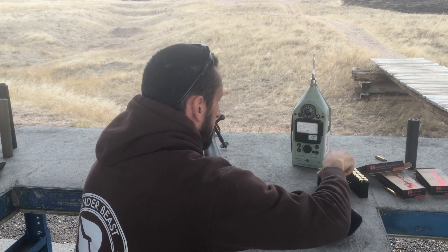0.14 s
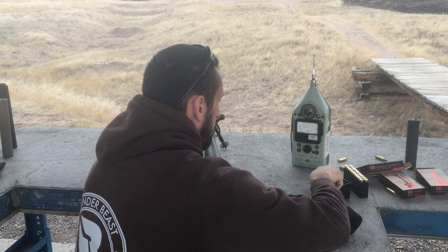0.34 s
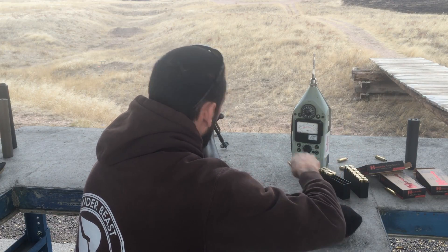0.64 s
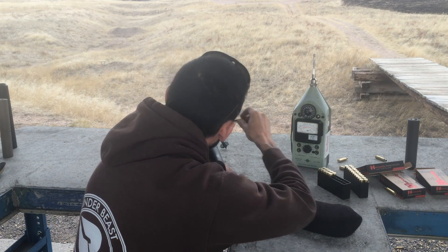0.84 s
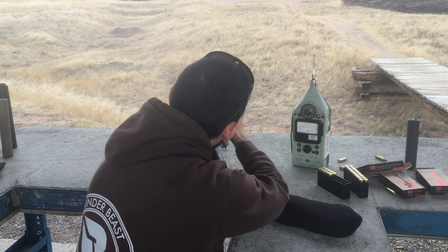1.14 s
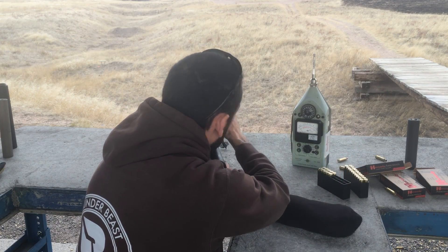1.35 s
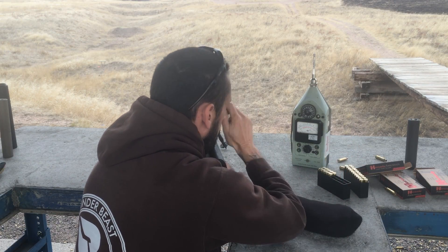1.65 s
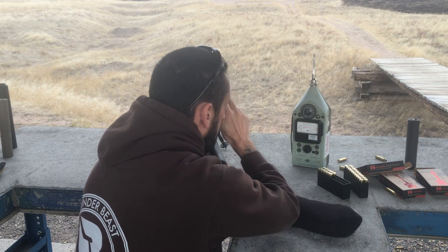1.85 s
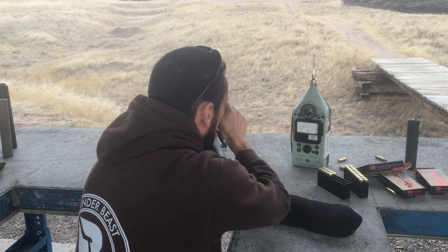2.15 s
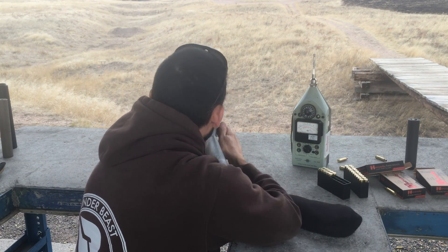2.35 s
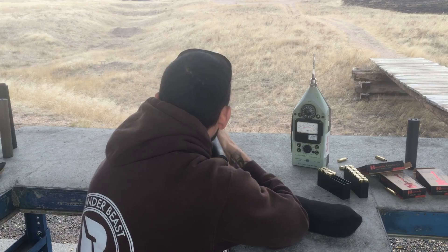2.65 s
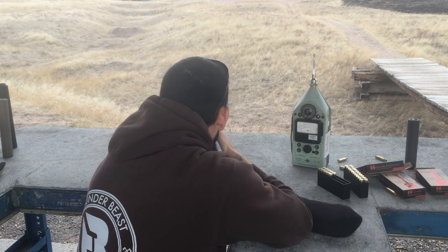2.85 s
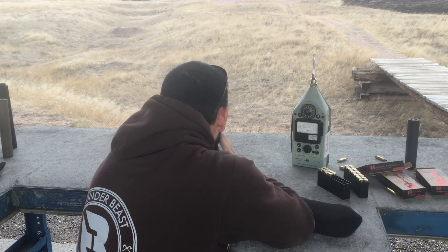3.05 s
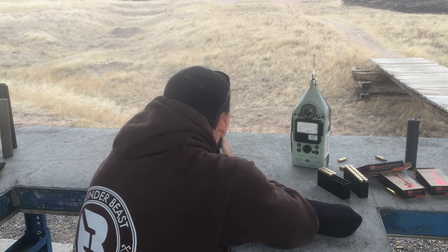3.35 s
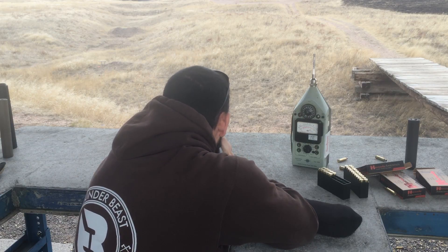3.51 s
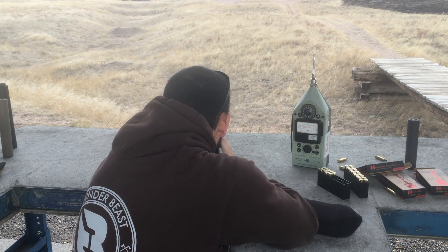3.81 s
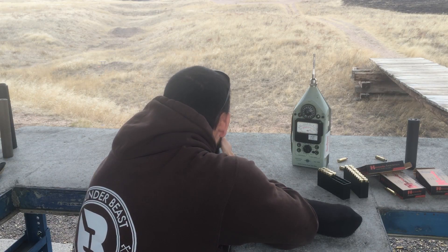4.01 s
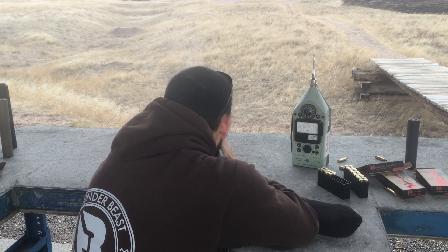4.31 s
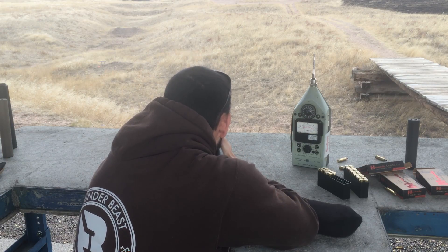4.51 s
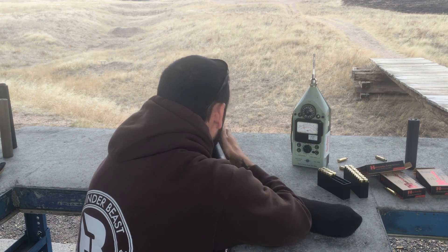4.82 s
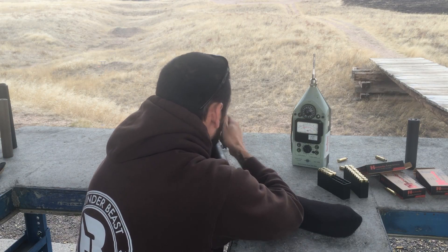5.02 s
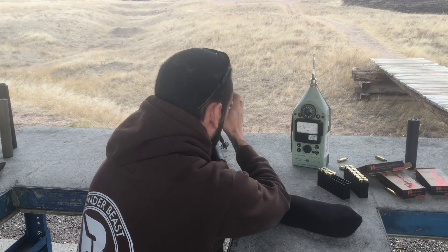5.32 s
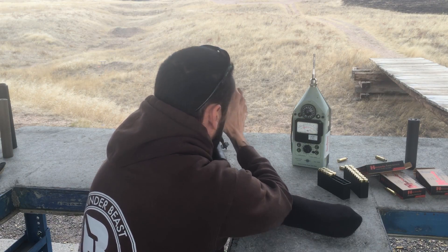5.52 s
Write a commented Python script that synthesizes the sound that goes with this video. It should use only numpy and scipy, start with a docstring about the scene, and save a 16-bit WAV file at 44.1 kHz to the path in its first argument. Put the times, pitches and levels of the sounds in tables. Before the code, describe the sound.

A single microphone near a rifle under a shelter roof hears small knocks and brass chinks, then a busy run of steel clatter ending in a firm bolt clack. After a quiet, windy wait with tiny regular ticks, a suppressed shot bursts as crack, gritty gas and low thump, scatters briefly off the slope, and the bolt is worked again.

```python
"""A suppressed rifle on a concrete bench under a shelter roof, heard by one microphone just behind it.
All through, wind buffets the microphone over a low background and a far motor drones: shaped noise.
First a cartridge is picked up and loaded and the steel bolt closed: bursts of contacts ringing resonances.
From 0.7 s a small mechanism ticks about once a second: paired sines with a noisy snap. At 4.3 s comes one
shot: soft noise, a tone, crack, venting gas and boom; noise and slaps off the hillside; the bolt opens."""
import sys
import numpy as np
from scipy import signal
from scipy.fft import rfft, irfft
from scipy.io import wavfile
from scipy.ndimage import uniform_filter1d

SR = 44100
rng = np.random.default_rng(int(sys.argv[2]) if len(sys.argv) > 2 else 0)


def transcribe(signal):
    """Save signal, clipped to [-1, 1], as a 16-bit WAV file at the path in sys.argv[1]."""
    frames = np.atleast_2d(signal).T
    limited = np.clip(frames, -1, 1)
    pcm = np.round(limited * 32767).astype(np.int16)
    wavfile.write(sys.argv[1], SR, pcm)


def ratio(d):
    """dB to gain"""
    e = np.asarray(d, float) / 20
    return 10 ** e


N = 249914

# Soft broad noise rising just before the blast, then a 2.65 kHz tone: [t/s, level/dB, share of tone 0-1]
LEAD_IN = [(4.2865, -38, 0), (4.296, -28, .7), (4.3025, -15, 1)]
LEAD_IN_HZ, LEAD_IN_T60_S = 2650, 0.05
BLAST_S = 4.307
# Spectrum of the vented gas: [f/Hz, relative density/dB]
GAS = [(88, -19), (150, -1.5), (328, -14.5), (523, -21.5), (636, -17.5), (1310, -10.5), (1500, -16),
       (2220, -13), (3480, -21.5), (4060, -20), (4840, -20), (5780, -21), (9050, -25.5), (15900, -32.5)]
# Decay of the gas by band: [f/Hz, T60/s, venting/s]
GAS_DECAY = [(150, 0.36, 0.025), (350, 0.28, 0.022), (700, 0.21, 0.026), (1500, 0.19, 0.028),
             (3050, 0.2, 0.028), (6000, 0.17, 0.032), (11800, 0.11, 0.039)]
GAS_DB = -11.5  # rms while venting, before the grit
# Boom of bench and roof: [f/Hz, level/dB, T60/s, onset after the blast/s]
BOOM = [(60.6, -16.5, .3, .01), (126.6, -10, 0.28, .0142), (187, -19.5, 0.17, 0.023),
        (228, -14, 0.12, 0.0057), (296.4, -14.5, 0.24, 0.0089), (406.8, -21.5, 0.18, 0.023),
        (653, -10.5, 0.024, 0.011)]

# Return from the hillside, middle band: [t/s, level/dB]
HILL = [(4.42, -41.5), (4.482, -52.5), (4.56, -51.5), (4.67, -51.5), (4.705, -53), (4.75, -51), (4.79, -53),
        (4.83, -50), (4.9, -59.5), (5.03, -73)]
# Separate slaps off boards and banks, except the second row, which doubles the mechanism's tick near 4.715 s:
# [t/s, peak level of the clean slap/dB, f/Hz, T60/s]
SLAPS = [(4.659, -35.5, 3160, 0.017), (4.7145, -46, 2970, .015), (4.7257, -33, 2190, 0.013),
         (4.7475, -37.5, 1660, 0.032), (4.7985, -39, 2330, .05), (4.809, -48.5, 2070, .05),
         (4.8337, -36, 1730, 0.036), (4.856, -41, 1700, 0.042)]
# Treble and bass against the middle band: farther ground comes back duller
HILL_TREBLE_DB, HILL_TREBLE_DB_PER_S = -5.5, -49
HILL_BASS_DB, HILL_BASS_DB_PER_S = 1, -20.5

# Tray, bolt and stock handled: [t/s, peak level of the body/dB, ring f/Hz, brightness re body/dB, T60/s]
KNOCKS = [(0.038, -39.5, 1690, -18, 0.035), (0.087, -51, 1950, -11.5, 0.11), (0.128, -55, 1000, -21, 0.037),
          (0.219, -31, 2160, -11.5, 0.12), (0.314, -39, 1500, -30, 0.14), (0.37, -45.5, 1390, -23, 0.14),
          (0.458, -52.5, 1120, -24, 0.22), (0.513, -50, 1110, -17, 0.19), (0.54, -52.5, 1180, -18, 0.34),
          (1.284, -48, 1380, -11, 0.28), (1.342, -50, 1080, -24, 0.43), (1.389, -42, 1066, -15, 0.28),
          (1.412, -43.5, 1290, -5.5, 0.18), (1.43, -39, 1566, -0.5, 0.18), (1.544, -44.5, 1410, -3.5, 0.3),
          (1.577, -47, 2220, -12, 0.17), (1.785, -51, 900, -25, 0.56), (1.817, -44.5, 935, -21, 0.25),
          (1.85, -39.5, 1140, -2, 0.2), (1.864, -38, 1310, -5.5, 0.091), (1.897, -32.5, 1117, -9, 0.3),
          (1.924, -42, 1360, -1.5, 0.25), (1.975, -37.5, 1264, -8.5, 0.71),
          (2.019, -29.5, 1130, -16.5, 0.13), (2.042, -29.5, 904, -12, 0.22), (2.074, -34.5, 1000, 0, 0.1),
          (2.269, -49.5, 1100, -12, 0.12), (2.303, -52, 1020, 1.5, 0.27), (2.353, -22.5, 1170, -10, 0.084),
          (2.363, -29, 950, -6, 0.086), (3.32, -61.5, 1640, -5.5, 0.44), (4.09, -58.5, 1920, -6, 0.098),
          (4.204, -56, 1480, -11, 0.092), (5.039, -33.5, 1000, -17, 0.035), (5.099, -33, 1084, -9, 0.14),
          (5.209, -29.5, 1210, -11, 0.2), (5.227, -31, 1130, -4, 0.11), (5.317, -52, 1450, -19, 0.34),
          (5.509, -46, 988, -8.5, 0.19), (5.568, -36.5, 2630, -7, 0.23), (5.639, -36, 1070, -14, 0.25),
          (5.657, -27.5, 1090, -3, 0.28)]
# Resonances of the steel: [f/Hz, width of the first filter/Hz, relative level/dB]
STEEL = [(619.4, 59, 9.5), (1000, 62, 7), (1178, 6.1, 8.5), (1873, 16, 4.5), (2140, 180, 4.5),
         (2439, 60, 4.5), (2547, 30, -3), (3353, 60, -3)]
SCRAPE_S, RISE_S, STEEL_SHARE = 0.0036, 0.0012, 0.98  # the same for every knock
RING_WIDTH_HZ, RING_SHARE = 68, 0.35  # narrow core of a knock's own ring; share at 1 kHz, less above
TREBLE_DB = -10  # top band of a knock against its bright band
TREBLE_RISE_S = 0.0071  # the top band builds as the parts slide
# Clean single taps of a hard part: [t/s, peak level/dB, f/Hz, T60/s]
TAPS = [(0.0379, -30, 1830, 0.015), (0.0915, -45, 1180, 0.0054), (0.3743, -41, 1300, 0.0045),
        (4.203, -55, 2280, 0.0072), (5.031, -62, 8000, 0.0052), (5.0384, -31, 2330, 0.0035),
        (5.2153, -37.5, 1230, 0.18), (5.2242, -32, 1210, 0.11), (5.226, -36, 2560, 0.05),
        (5.318, -43, 1500, 0.0082), (5.657, -62, 3320, 0.035)]

# Brass case touched: [t/s, peak level/dB, rubbing/s, fourth mode/dB, fifth mode/dB]
CHINKS = [(0.2214, -52, 0.0054, -1, -26), (0.315, -55.5, 0.0061, -20, -30), (1.4376, -54, 0.0096, 3, -45),
          (1.545, -46, 0.0045, -9, -18), (1.921, -40, 0.018, -32, -21), (5.657, -38.5, 0.01, 8, 3)]
# Modes of the brass case: [f/Hz, T60/s]
BRASS = [(5500, .2), (9092, .16), (9216, .12), (11400, .05), (15370, .15)]
# Relative levels of the three lower brass modes: [level/dB]
BRASS_LOW_DB = [-12, 6, -3]

TICK_S, TICK_EVERY_S, TOCK_LAG_S = .6998, 1.004, .1165
TICK_DB, TOCK_DB = -42.5, -51.5

# Wind strength on the microphone, before the two shares: [t/s, level/dB]
WIND = [(0, -57), (0.35, -54), (0.9, -60), (1.4, -56.5), (2.2, -56.5), (2.45, -47.5), (2.68, -56),
        (2.8, -47.5), (3.05, -59), (3.45, -53.5), (3.9, -54.5), (4.27, -55), (4.45, -43.5), (4.9, -41.5),
        (5.2, -50.5), (5.4, -43.5), (5.56, -54.5), (5.67, -53.5)]
# Spectrum of the buffeting: [f/Hz, relative density/dB]
BUFFET = [(8.8, -42.5), (15, -6.5), (59, 12), (100, -6), (139, -21), (222, -37.5), (288, -25), (384, -29.5),
          (400, -25), (520, -67), (880, -120)]
BUFFET_DB, RUMBLE_DB = -2.5, -3.5  # shares of the wind
GUSTS_PER_S, GUST_DB = 14, 2.2  # quick chance swings of each share
# Gusts that push the diaphragm once: [t/s, level/dB, f/Hz]
POPS = [(1.957, -41.5, 79), (2.773, -34.5, 82), (5.322, -33.5, 68.8), (5.397, -37, 53.4), (5.447, -39, 60),
        (5.488, -38, 60), (5.528, -36, 58)]
# Low-weighted background noise that swells around the handling: [t/s, level/dB]
BACKGROUND = [(0.0, -69.5), (1.4, -63), (1.9, -81), (2.4, -55.5), (2.6, -67), (4.2, -67), (4.4, -64),
              (5.2, -53), (5.35, -65.5), (5.67, -59)]
# Spectrum of the background noise: [f/Hz, relative density/dB]
BACKGROUND_SPECTRUM = [(71, -18), (120, 1), (161, -9.5), (325, -17), (436, -7.5), (477, -11), (639, -11),
                       (762, -16.5), (964, -17.5), (4000, -37.5), (5200, -58), (8800, -120)]
DRONE_HZ = 447.7
# Far motor: [t/s, level/dB]
DRONE = [(0, -83), (1.5, -75), (2.2, -67.5), (3.2, -70.5), (3.6, -83), (4.3, -77), (5.67, -89)]

# Spectrum of the microphone noise: [f/Hz, relative density/dB]
HISS = [(880, -15), (1500, -30), (1690, -7.5), (1840, -10), (2650, -9), (2730, -14), (4880, -13.5),
        (6420, -13.5), (7370, -13), (8620, -9.5), (10600, -20), (12500, -13), (15700, -24)]
HISS_DB = -76.5
# Dips of the microphone port: [f/Hz, width/Hz, depth 0-1]
PORT_DIPS = [(4890, 1440, 0.6), (10430, 680, 1)]
TOP_HZ = 15900


def curve(table):
    """Columns of a table over the whole time, the ends held."""
    s, *columns = np.transpose(table)
    return [np.interp(np.arange(N) / SR, s, c) for c in columns]


def unit(x):
    """Scale to rms 1."""
    return x / np.sqrt(np.mean(x ** 2))


def peak(x):
    """Scale to peak 1."""
    return x / np.abs(x).max()


def coloured(points, size=N):
    """Noise with a spectrum of (Hz, dB) points, rms 1."""
    hz, db = np.transpose(points)
    log_f = np.log(np.fft.rfftfreq(size, 1 / SR) + 1)
    gain = ratio(np.interp(log_f, np.log(hz), db))
    return unit(irfft(rfft(rng.standard_normal(size)) * gain, size))


def ring(x, hz, width_hz):
    """Two-pole resonance, gain 1 at the centre."""
    return signal.lfilter(*signal.iirpeak(hz, hz / min(width_hz, SR / 4), fs=SR), x)


def fall(t, t60):
    """Nothing before time 0, then a decay of 60 dB in t60."""
    return (t >= 0) * ratio(-60 * np.maximum(t, 0) / t60)


def flutter(rate, size=N):
    """Noise smoothed twice over 1/rate seconds, rms 1."""
    k = max(int(SR / rate), 1)
    smooth = uniform_filter1d(rng.standard_normal(size), k)
    return unit(uniform_filter1d(smooth, k))


def add(out, s, x):
    """Mix x in at time s."""
    i = int(s * SR)
    out[i:i + len(x)] += x[:N - i]


def blow(size):
    """One sharp contact a few samples long."""
    return np.pad(np.hanning(5), (0, size - 5))


def tap(hz, t60, scatter=0.11):
    """A struck resonance: a few clean swings with a rough skirt, peak 1."""
    t = np.arange(SR // 10) / SR
    swings = np.sin(2 * np.pi * hz * t) * np.minimum(t * hz / 2, 1) * fall(t, t60)
    rough = ring(ring(rng.standard_normal(len(t)), 0.89 * hz, 0.17 * hz), hz, 2 * hz)
    skirt = peak(rough) * fall(t, 3.7 * t60)
    return peak(swings + scatter * skirt)


def lead_in(noise_share=0.54):
    """Just before the blast: soft broad noise alone, then joined by a decaying sine tone."""
    out, t = np.zeros(N), np.arange(SR) / SR
    for s, db, tone_share in LEAD_IN:
        noise = ring(ring(rng.standard_normal(SR), 1500, 2700), 1500, 3000)
        mixed = tone_share * np.sin(2 * np.pi * LEAD_IN_HZ * t) + noise_share * unit(noise)
        add(out, s, ratio(db) * mixed * np.minimum(t / 0.0013, 1) * fall(t, LEAD_IN_T60_S))
    return out


def blast(crack_db=-12, grit_db=1.0):
    """A sharp crack, gas venting from the baffles as gritty noise, and the sine modes of bench and roof."""
    out, t = np.zeros(N), np.arange(SR) / SR
    gas = coloured(GAS, size=SR) * ratio(GAS_DB + grit_db * flutter(530, size=SR))
    hz, t60, venting = np.transpose(GAS_DECAY)
    log_f = np.log(np.fft.rfftfreq(SR, 1 / SR) + 1)
    for k in range(len(hz)):
        # overlapping bands, each held while venting and then decaying at its own rate
        in_band = np.interp(log_f, np.log(hz), np.arange(len(hz)) == k)
        band = irfft(rfft(gas) * in_band, SR)
        add(out, BLAST_S, band * fall(np.maximum(t - venting[k], 0), t60[k]))
    # pressure ramps from positive to negative within 0.8 ms
    add(out, BLAST_S, ratio(crack_db) * (1 - 2 * t / 0.00054) * (t < .0008))
    for hz, db, t60, lag in BOOM:
        rise = np.minimum(t * hz / 0.81, 1)
        add(out, BLAST_S + lag, ratio(db) * np.sin(2 * np.pi * hz * t) * rise * fall(t, t60))
    return out


def hillside(patchy_db=1.2, crackle_db=0.0):
    """The shot scattered back by rough ground as patchy noise growing duller, with a few clear slaps."""
    t = np.arange(N) / SR
    since = np.maximum(t - HILL[0][0], 0)
    noise = rng.standard_normal((3, N))
    mid = unit(ring(ring(ring(noise[0], 1200, 2200), 2230, 2420), 1380, 2400))
    high = unit(ring(ring(noise[1], 4100, 4600), 5500, 7000))
    high = high * ratio(HILL_TREBLE_DB + HILL_TREBLE_DB_PER_S * since)
    low = unit(ring(ring(noise[2], 185, 206), 160, 250))
    low = low * ratio(HILL_BASS_DB + HILL_BASS_DB_PER_S * since)
    # faded in from the first row and out to the last
    heard = np.clip(since / 0.034, 0, 1) * np.clip((HILL[-1][0] - t) / 0.045, 0, 1)
    out = heard * ratio(curve(HILL)[0] + patchy_db * flutter(190)) * (mid + high + low)
    for s, db, hz, t60 in SLAPS:
        rough = ring(ring(rng.standard_normal(SR // 10), 1.3 * hz, 1.06 * hz), hz, 1.5 * hz)
        crackle = peak(rough) * fall(t[:SR // 10], t60)
        add(out, s, ratio(db) * (tap(hz, t60, scatter=0.69) + ratio(crackle_db) * crackle))
    return out


def handling(grain_db=3.5, blow_share=3.5, own_width=0.96, roof_db=-18, roof_t60=0.34, thud_db=-12):
    """Each knock is a blow and a short scrape of tiny contacts that ring steel and bench; the roof smears it."""
    out, t = np.zeros(N), np.arange(SR // 2) / SR
    for s, db, hz, bright_db, t60 in KNOCKS:
        contacts = rng.standard_normal(len(t)) * ratio(grain_db * flutter(350, size=len(t)))
        shape = np.minimum(t / RISE_S, 1) * fall(np.maximum(t - RISE_S - SCRAPE_S, 0), t60)
        push = unit(contacts) * shape + blow_share * blow(size=len(t))
        push += rng.standard_normal(len(t)) * ratio(roof_db) * fall(t, roof_t60)

        steel = sum(ratio(d) * ring(ring(push, f, w), f, f / 2) for f, w, d in STEEL)
        own = ring(ring(ring(push, hz, own_width * hz), hz, hz), hz, hz)
        bench = ring(ring(push, 370, 360), 190, 430)
        core = ring(ring(push, hz, RING_WIDTH_HZ), hz, hz / 2)
        body = STEEL_SHARE * peak(steel) + peak(own)
        body += RING_SHARE * (1000 / hz) ** 2 * peak(core) + ratio(thud_db) * peak(bench)

        bright = ring(ring(ring(push, 3500, 2600), 3500, 2600), 3500, 2600)
        slide_shape = np.minimum(t / TREBLE_RISE_S, 1) * fall(np.maximum(t - TREBLE_RISE_S, 0), t60)
        slide = contacts * slide_shape
        edge = ring(ring(ring(slide, 8500, 7000), 8500, 7000), 8500, 7000)
        treble = peak(bright) + ratio(TREBLE_DB) * peak(edge)
        add(out, s, ratio(db) * (peak(body) + ratio(bright_db) * treble))
    return out


def taps():
    """Hard parts meeting once, each a single struck resonance."""
    out = np.zeros(N)
    for s, db, hz, t60 in TAPS:
        add(out, s, ratio(db) * tap(hz, t60))
    return out


def brass():
    """The thin case rings high while rubbed and shortly after; where it is held sets the upper modes."""
    out, t = np.zeros(N), np.arange(SR // 3) / SR
    for s, db, rub, *upper_db in CHINKS:
        push = rng.standard_normal(len(t)) * (t < max(rub, .001))
        tone = np.zeros(len(t))
        for (hz, t60), mode_db in zip(BRASS, BRASS_LOW_DB + upper_db):
            width_hz = np.log(1000) / np.pi / t60  # resonance width that gives this T60
            tone += ratio(mode_db) * unit(ring(push, hz, width_hz))
        add(out, s, ratio(db) * peak(tone))
    return out


def ticks(hz=2100, upper_hz=2650, t60=0.0097, edge_db=-3):
    """The small mechanism: a tick about every second and a fainter tock, two decaying sines and a noisy snap."""
    out, t = np.zeros(N), np.arange(2000) / SR
    for s in np.arange(TICK_S, N / SR, TICK_EVERY_S):
        for lag, db in ((0, TICK_DB), (TOCK_LAG_S, TOCK_DB)):
            tones = np.sin(2 * np.pi * hz * t) + 0.83 * np.sin(2 * np.pi * upper_hz * t)
            body = tones * np.minimum(t / 0.00099, 1) * fall(t, t60)
            snap = ring(ring(rng.standard_normal(len(t)), 2500, 2700), 2900, 5100) * fall(t, 0.016)
            add(out, s + lag, ratio(db) * (body + ratio(edge_db) * snap))
    return out


def wind():
    """Wind on the microphone: low buffeting and rumble, each swinging by chance under one strength."""
    rumble = unit(ring(ring(rng.standard_normal(N), 97, 60), 66, 45))
    rumble = rumble * ratio(RUMBLE_DB + GUST_DB * flutter(GUSTS_PER_S))
    buffet = coloured(BUFFET) * ratio(BUFFET_DB + GUST_DB * flutter(GUSTS_PER_S))
    return ratio(curve(WIND)[0]) * (buffet + rumble)


def pops(cycles=0.9):
    """A swing or two of the diaphragm, centred on each gust."""
    t, out = np.arange(N) / SR, np.zeros(N)
    for s, db, hz in POPS:
        swell = np.exp(-((t - s) * hz / cycles) ** 2)
        out += ratio(db) * np.sin(2 * np.pi * hz * (s - t)) * swell
    return out


def background():
    """Low-weighted noise that swells around the handling and wavers quickly in level."""
    return coloured(BACKGROUND_SPECTRUM) * ratio(curve(BACKGROUND)[0] + 0.86 * flutter(24))


def motor():
    """A far motor: noise through one narrow resonance, so the drone wavers."""
    return unit(ring(rng.standard_normal(N), DRONE_HZ, 9.9)) * ratio(curve(DRONE)[0])


def scene():
    """Everything reaches one microphone."""
    near = lead_in() + blast() + handling() + taps() + brass() + ticks()
    around = hillside() + wind() + pops() + background() + motor()
    return (near + around)[None]


def roll_off(x):
    """The treble ends steeply here."""
    return signal.sosfilt(signal.butter(12, 16090, fs=SR, output="sos"), x)


def record(dry, top=0.91):
    """The microphone port thins two bands; then come hiss, soft overload towards top and a steep top cut."""
    for hz, width_hz, depth in PORT_DIPS:
        dry = dry - depth * ring(dry, hz, width_hz)
    hissy = dry + ratio(HISS_DB) * coloured(HISS)
    loud = top * np.tanh(hissy / top)
    cut = signal.ellip(8, .2, 70, TOP_HZ, fs=SR, output="sos")
    return roll_off(signal.sosfilt(cut, loud))


dry = scene()
out = record(dry)
transcribe(out)
```